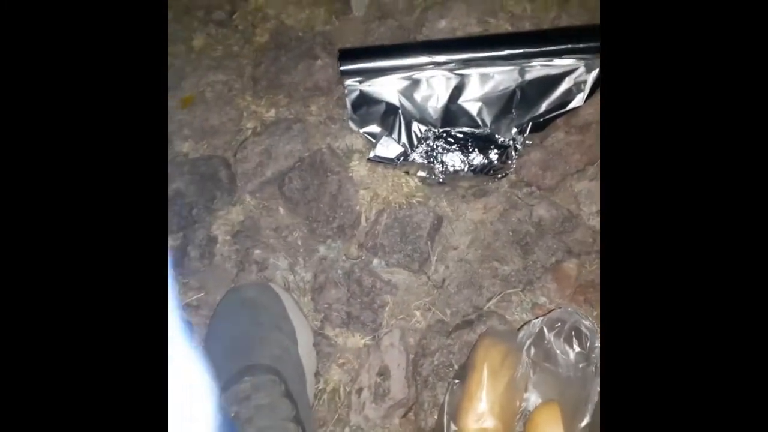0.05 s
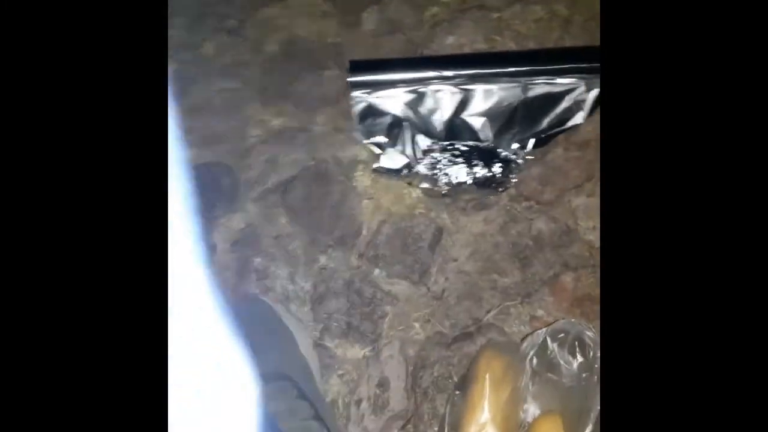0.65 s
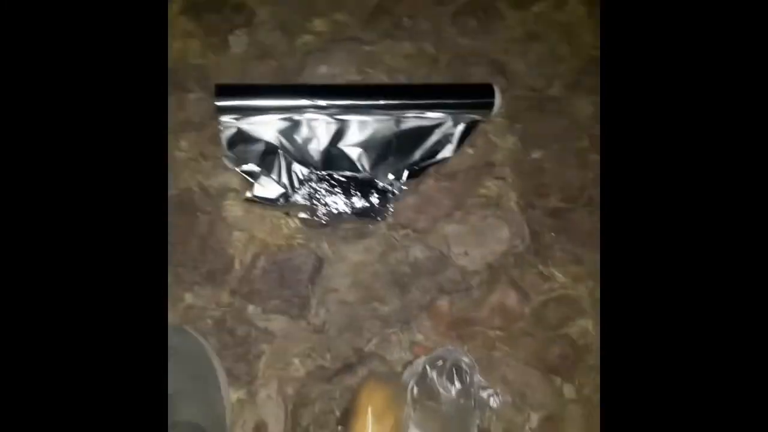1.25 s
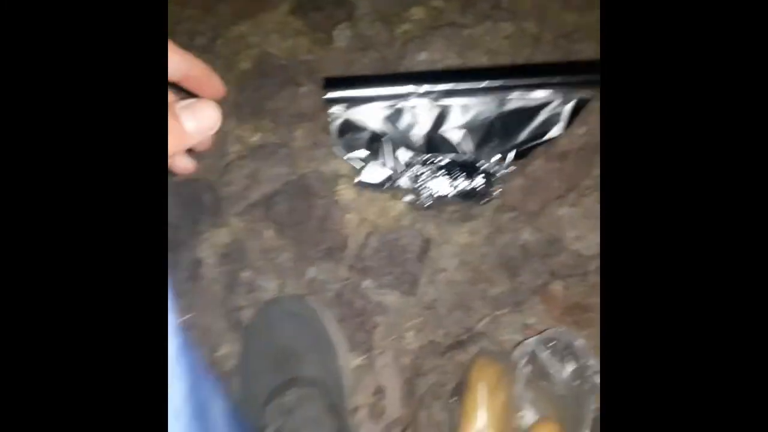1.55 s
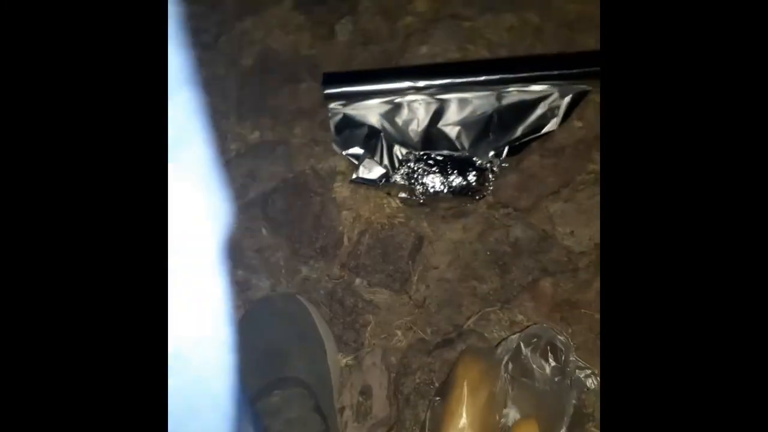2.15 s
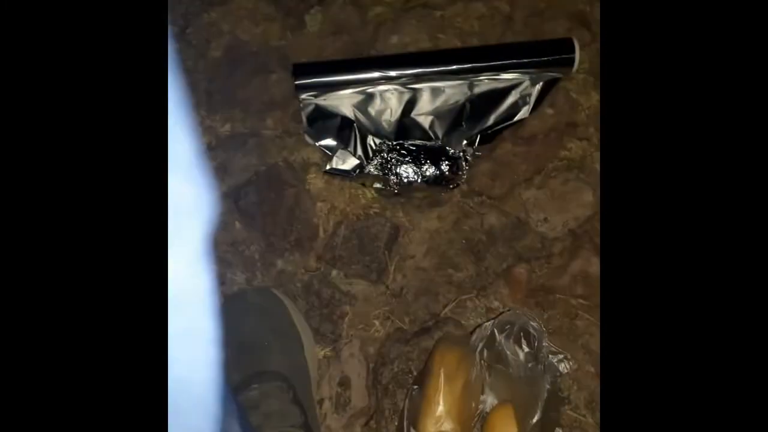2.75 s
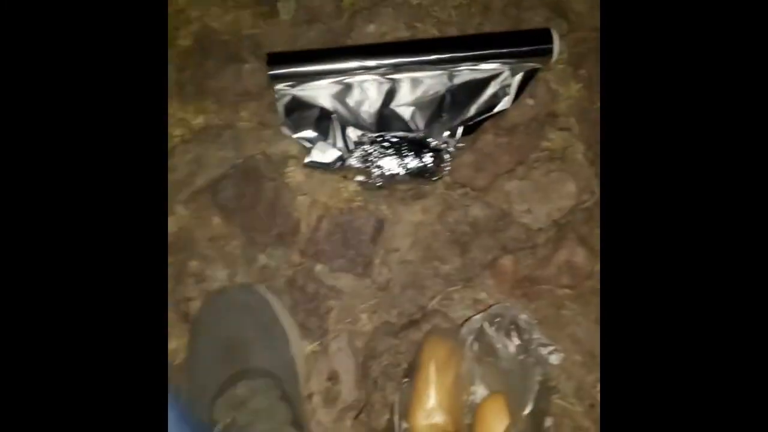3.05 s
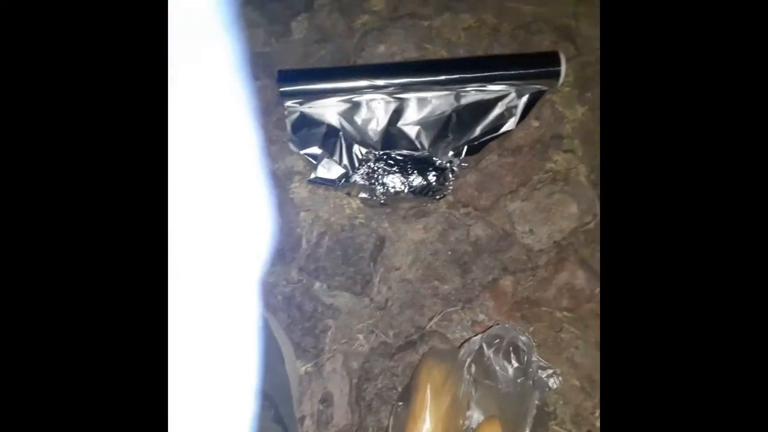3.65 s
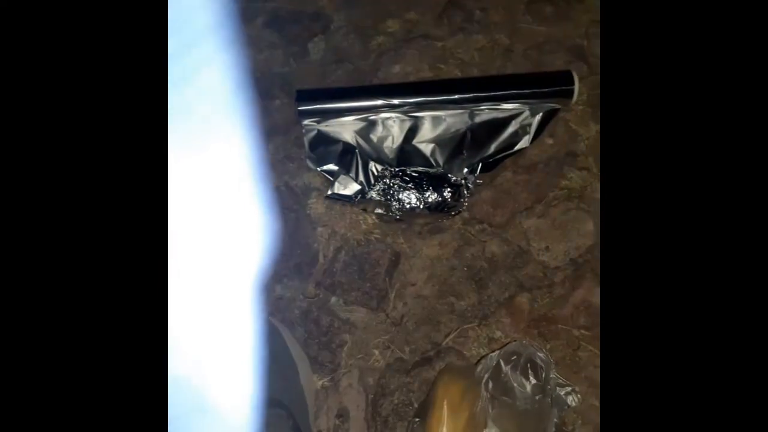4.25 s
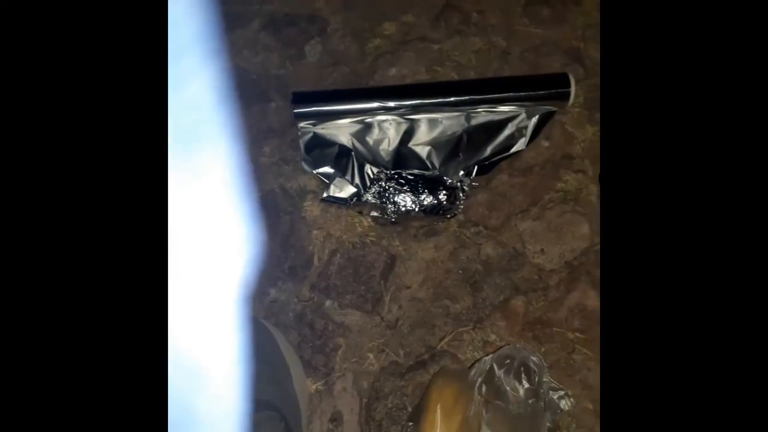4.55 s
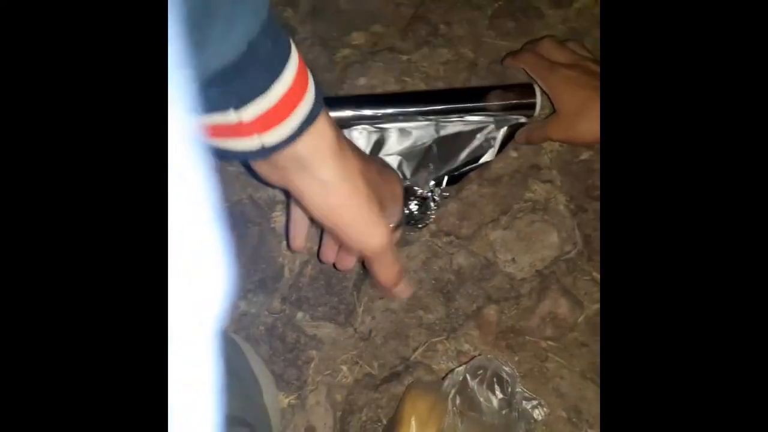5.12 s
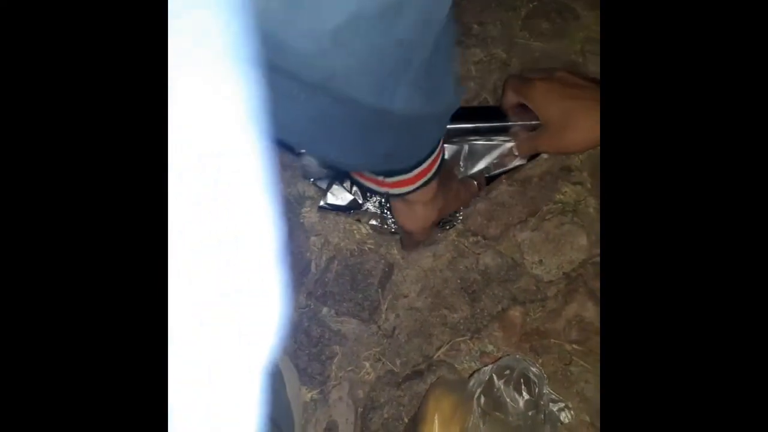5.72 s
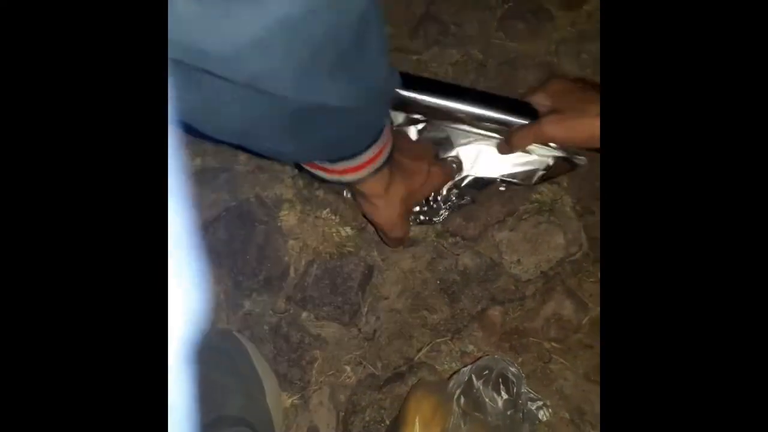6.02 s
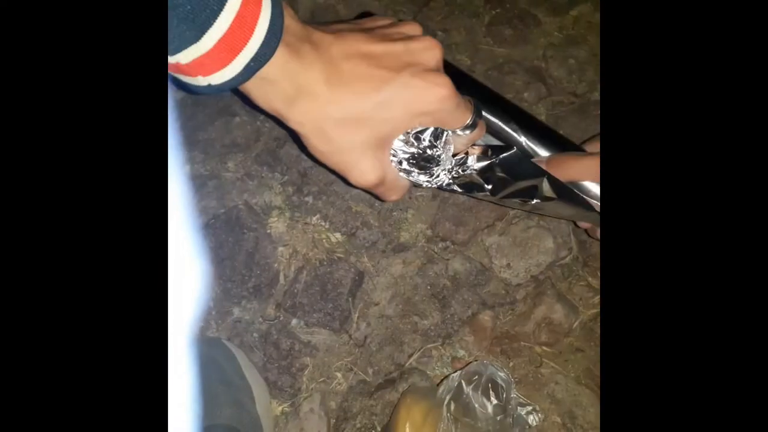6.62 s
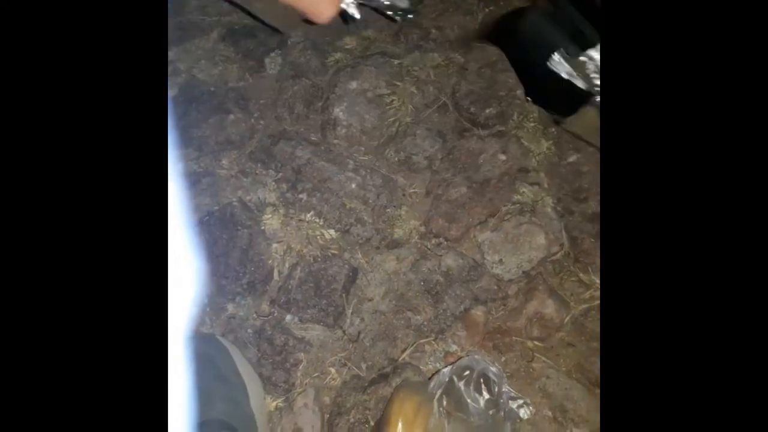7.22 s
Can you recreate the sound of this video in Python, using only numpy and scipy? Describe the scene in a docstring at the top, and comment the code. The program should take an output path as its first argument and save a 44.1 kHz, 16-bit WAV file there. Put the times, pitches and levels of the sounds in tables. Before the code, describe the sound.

For the first four seconds, a hand and clothing rub directly on a hand-held microphone, giving uneven rasps and low scraping that shift between left and right. The case creaks and clicks in clusters, thickest around 1 second, with dull finger bumps and a couple of strong knocks near 2.9 seconds. Behind this is still outdoor night air, with a distant insect trilling briefly and very faintly. From about 4 seconds a sleeve slides with a soft hiss. At about 4.5 seconds aluminium foil begins to crinkle close by, then is pressed and crumpled in repeated squeezes, with bright metallic crackles and small sharp snaps. More loud creaks and bumps from the grip come between 4.7 and 6 seconds, over a low handling rumble. At about 7 seconds the foil is torn off the roll with one quick rip, and the crinkling dies down by 7.5 seconds.

```python
"""Stony ground outdoors at night: someone wraps food in aluminium foil by a hand-held microphone pair.
Far off in the still air an insect trills faintly. At first a hand and clothing rub right over the two
microphone ports, and the case creaks and bumps in the grip. Then a sleeve slides and the foil is pressed
and crumpled: thousands of tiny creases buckle and set the sheet ringing. Near the end it is torn off
the roll with one quick rip."""
import sys
import numpy as np
from scipy import signal
from scipy.io import wavfile

SR = 44100
rng = np.random.default_rng(int(sys.argv[2]) if len(sys.argv) > 2 else 0)


def waveform_to_disk(signal):
    """Save audio, clipped to [-1, 1], as 16-bit WAV at the path in sys.argv[1]."""
    frames = np.transpose(np.atleast_2d(signal))
    scaled = np.clip(frames, -1, 1) * 32767
    samples = np.round(scaled).astype(np.int16)
    wavfile.write(sys.argv[1], SR, samples)


N = 329868
TIME = np.arange(N) / SR
SHORT_TIME = np.arange(SR // 12) / SR   # time axis of one short sound


def from_db(db):
    """Decibels to gain."""
    return np.exp(np.asarray(db) * (np.log(10) / 20))


def unit_power(x):
    """Scale to a mean square of 1."""
    return x / np.sqrt(np.mean(x ** 2) + 1e-20)


def unit_peak(x):
    """Scale to a peak of 1."""
    return x / np.abs(x).max()


def curves(rows):
    """One curve over time for each column after the first, which holds the seconds."""
    times, *columns = np.transpose(rows)
    return [np.interp(TIME, times, column) for column in columns]


def drift(per_s):
    """A random wander of unit power that turns per_s times a second."""
    points = rng.standard_normal(4096)
    return unit_power(np.interp(TIME * per_s, np.arange(len(points)), points))


def stroke(at_s, swell_s, hold_s, fade_s):
    """Gain of one movement: it swells to 1 at at_s, holds and fades; each slope spans 26.5 dB."""
    away = np.maximum((at_s - TIME) / swell_s, (TIME - at_s - hold_s) / fade_s)
    return from_db(-26.5 * np.clip(away, 0, 10))


def add(track, start_s, sound):
    """Mix a short sound into a track."""
    i = round(start_s * SR)
    track[..., i:i + sound.shape[-1]] += sound[..., :N - i]


def panned(pan_db):
    """Gains of the two microphone ports, the left louder by pan_db."""
    return from_db([[pan_db / 2], [-pan_db / 2]])


def spread(middle, side, side_db, pan_db):
    """A sound in front of both ports, with a part that differs between them."""
    side_gain = from_db(side_db)
    return (middle + side_gain * side * [[1], [-1]]) / np.hypot(1, side_gain) * panned(pan_db)


def band(x, low_hz, high_hz, order=2):
    """Causal band-pass."""
    sos = signal.butter(order, [low_hz, min(high_hz, .45 * SR)], "band", fs=SR, output="sos")
    return signal.sosfilt(sos, x + 1e-18)


def resonance(x, hz, width_hz):
    """One resonance of gain 1 at its centre."""
    return signal.lfilter(*signal.iirpeak(hz, hz / width_hz, fs=SR), x + 1e-18)


def gliding_resonance(x, hz, width_hz):
    """A resonance whose centre follows a curve, stepped in short blocks."""
    out, state, block = np.zeros_like(x), np.zeros((len(x), 2)), 256
    radius = np.exp(-np.pi * width_hz / SR)
    for i in range(0, N, block):
        poles = [1, -2 * radius * np.cos(2 * np.pi * hz[i] / SR), radius ** 2]
        out[:, i:i + block], state = signal.lfilter([1, 0, -1], poles, x[:, i:i + block], zi=state)
    return out * (1 - radius ** 2) / 2


def tick(low_hz, high_hz):
    """A single sharp pulse; peak 1."""
    return unit_peak(band(signal.unit_impulse(len(SHORT_TIME)), low_hz, high_hz))


def burst(low_hz, high_hz, t60):
    """A puff of noise that dies at once; peak 1."""
    puff = rng.standard_normal(len(SHORT_TIME)) * from_db(-60 * SHORT_TIME / t60)
    return unit_peak(band(puff, low_hz, high_hz))


def grains(per_s, spread_db):
    """Tiny slips at random moments: many small, few large; the power stays even as the rate changes."""
    sizes = from_db(spread_db * np.minimum(rng.exponential(1, N), 4)) * rng.choice([-1, 1], N)
    slipping = rng.random(N) < per_s / SR
    return slipping * sizes / np.sqrt(np.mean(sizes ** 2) * per_s / SR)


def friction(per_s, spread_db, smooth_db):
    """Two excitations that share the same slips, over a smooth sliding hiss."""
    return (grains(per_s, spread_db) + from_db(smooth_db)) * rng.standard_normal((2, N))


def coloured(excitations, spectrum, tilt_db=0, patchy_db=0):
    """Two excitations dealt in turn to third-octave bands, tilted per octave; each band flickers."""
    hz, level_db = np.transpose(spectrum)
    edges = np.geomspace(hz[0], hz[-1], round(3 * np.log2(hz[-1] / hz[0])) + 1)
    centres = np.sqrt(edges[1:] * edges[:-1])
    power = from_db(np.interp(np.log(centres), np.log(hz), level_db)) ** 2 * np.diff(edges)
    out = 0
    for k, share in enumerate(power / power.sum()):
        gain = from_db(tilt_db * np.log2(centres[k] / 3400) + patchy_db * drift(40))
        out += np.sqrt(share) * gain * unit_power(band(excitations[k % 2], edges[k], edges[k + 1]))
    return out


# The night air all round the microphones. Each row: frequency in Hz, relative density in dB.
AIR_SPECTRUM = [(30, -10.5), (110, -24), (350, -5), (800, -11), (4500, -6), (9500, -20.5), (16000, -16.5)]


def night_air():
    """Still air: a faint hush, its own at each port."""
    hush = [coloured(rng.standard_normal((2, N)), AIR_SPECTRUM) for _ in range(2)]
    return from_db(-67) * np.array(hush)


# One insect, far off in the dark. Each row: start in seconds, length in seconds, level in dB.
TRILLS = [(1.42, 0.081, -60), (2.775, 0.35, -66), (3.958, .1, -70)]


def insect():
    """A thin, wavering tone, pulsed by about 60 wing strokes a second."""
    phrases = sum(from_db(db) * stroke(start_s, .02, length_s, .02) for start_s, length_s, db in TRILLS)
    tone = unit_power(np.array([np.sin(2 * np.pi * 2980 * TIME + 2 * drift(170)) for _ in range(2)]))
    wing_strokes = 1 + .8 * np.sin(2 * np.pi * 60 * TIME + drift(8))
    return phrases * tone * wing_strokes


# An arm reaches for the foil, in front of the microphones. Each row: time in seconds, level in dB.
SLEEVE_LEVELS = [(4.03, -72), (4.08, -55.5), (4.45, -47.5), (4.68, -53.5), (4.9, -90)]
# The colour of its sleeve. Each row: frequency in Hz, relative density in dB.
SLEEVE_SPECTRUM = [(410, -41), (700, -8), (1170, -9.5), (1260, -8), (2020, -12.5), (2590, -8),
                   (4800, -10.5), (16000, -50)]


def sleeve():
    """Smooth hiss of cloth sliding on cloth."""
    level_db, = curves(SLEEVE_LEVELS)
    hiss = [coloured(rng.standard_normal((2, N)), SLEEVE_SPECTRUM, patchy_db=3) for _ in range(2)]
    return spread(*hiss, side_db=1, pan_db=1) * from_db(level_db)


# The hand shifts on the microphone case while the foil is worked. Each row: time in seconds, level in dB.
GRIP_LEVELS = [(4.2, -62.5), (5.0, -44), (5.28, -62), (5.52, -34), (5.66, -44), (6.15, -52), (6.64, -50),
               (6.71, -36.5), (6.81, -36), (6.88, -52), (7.1, -37.5), (7.45, -55)]


def grip_rumble():
    """The shifting grip sends a dull rumble through the case, its own at each port."""
    level_db, = curves(GRIP_LEVELS)
    rumble = unit_power(band(rng.standard_normal((2, N)), 61, 143))
    return rumble * from_db(level_db) * panned(1.8) * (TIME > GRIP_LEVELS[0][0])


def fingertip_groan():
    """A fingertip drags over the case by the right port with a low, rough note that rises."""
    start_s, hold_s, rise_hz_per_s = .19, .085, 1600
    hz = 198 + rise_hz_per_s * np.clip(TIME - start_s, 0, hold_s)
    note = unit_power(gliding_resonance(rng.standard_normal((1, N)), hz, width_hz=91))
    return note * from_db(-43) * stroke(start_s, .035, hold_s, 2 * hold_s) * panned(-20.5)


# The case creaks with a brief, squeaky ring, close to one port. Each row: loudest moment in seconds,
# half length in seconds, pitch in Hz, level in dB, left over right in dB.
CREAK_RINGS = [(0.899, 0.0036, 1230, -28, -16), (0.928, 0.012, 1290, -42, -18),
               (2.9245, 0.0025, 1095, -28.5, 25)]


def creak_rings():
    """Quick sticking and slipping keeps one mode of the case ringing, unsteadily."""
    out = 0
    for at_s, half_s, hz, level_db, pan_db in CREAK_RINGS:
        tone = unit_power(np.sin(2 * np.pi * hz * TIME + drift(500)))
        envelope = np.exp(-((TIME - at_s) / half_s) ** 2)
        out += tone * envelope * from_db(level_db) * panned(pan_db)
    return out


# Cloth catches right at the microphones. Each row: start in seconds, level in dB, left over right in dB.
SNAGS = [(0.7132, -33, -3), (0.983, -34.5, -2), (1.911, -23, 20), (2.4432, -18.5, 19.5),
         (2.6755, -16.5, 13), (2.8727, -23, 26)]


def fibre_snags():
    """A fibre snags on the rim of a port with a bright, dry tick."""
    out = np.zeros((2, N))
    click = tick(4300, 6900) + tick(11000, 24000) / 2
    for start_s, level_db, pan_db in SNAGS:
        add(out, start_s, from_db(level_db) * click * panned(pan_db))
    return out


# The modes of the case: the stiff ones as each microphone hears them, and the low ones at both.
# Each row: frequency in Hz, relative level in dB, swell in seconds.
LEFT_MODES = [(760, -15, 0.00063), (1663, 7, 0.00032), (4050, 14.5, 0.00012), (6400, -2.5, 0.00023)]
RIGHT_MODES = [(900, -7.5, 0.0004), (1457, 15.5, 0.00034), (4600, -13, 0.00085), (6350, -18.5, 0.00044)]
LOW_MODES = [(122.7, -19.5, 0.0088), (353, 2.5, 0.0022), (840, 7.5, 0.00032)]


def case_ring(modes, tuning=1):
    """One blow on the case: each mode swells and dies, with a strength and pitch of its own; peak 1."""
    hz, level_db, swell_s = np.transpose(modes)[:, :, None]
    strength, detune = rng.standard_normal((2, len(modes), 1))
    envelopes = SHORT_TIME / swell_s * np.exp(-SHORT_TIME / swell_s)
    tones = np.sin(2 * np.pi * hz * tuning * np.exp(.04 * detune) * SHORT_TIME)
    return unit_peak((from_db(level_db + 1.5 * strength) * envelopes * tones).sum(0))


# A finger lands right on the left microphone port. Each row: start in seconds, level in dB.
KNOCKS = [(2.869, -7), (2.936, -3), (3.1658, -14)]


def port_knocks():
    """A sudden push of air into the left port, which leaks away while the case rings low."""
    out = np.zeros((2, N))
    push = band(tick(30, 5000), 130, 800, order=1)
    for start_s, level_db in KNOCKS:
        knock = push / push.max() + from_db(-11.5) * case_ring(LOW_MODES)
        add(out[0], start_s, from_db(level_db) * knock)
    return out


# Fingers on the case, around the microphones. Each row: start in seconds, relative level in dB at the
# nearer port, place (1 at the left port, -1 at the right).
BUMPS = [(1.022, -6, -1.1), (1.223, -5, -1.3), (1.583, -9, 0.68), (1.647, -6, 0.83), (1.723, -13, 0.74),
         (1.801, -11, 1), (2.441, -14, -0.59), (2.661, -9, -0.59), (2.869, -0.5, 0.77), (2.892, 0, 0.63),
         (3.12, -14.5, 0.78), (3.248, -9, 0.86), (3.332, -20.5, 1), (3.37, -20.5, -0.77),
         (3.65, -9.5, -1.3), (3.829, -19.5, -1.3), (4.596, -14.5, -0.9), (4.721, -6.5, -1),
         (4.807, -8, -0.47), (5.795, -8.5, -1.5), (6.143, -9.5, 0.3)]


def finger_bumps():
    """Soft bumps reach only the low modes of the case, at each port in its own way."""
    shadow_db = 34.5   # a bump on one port is this much weaker at the other
    out = np.zeros((2, N))
    for start_s, near_db, place in BUMPS:
        for port, distance in zip(out, (-place, place)):
            level_db = near_db - shadow_db * max(distance, 0)
            thump = unit_peak(band(case_ring(LOW_MODES), 40, 163))
            add(port, start_s, from_db(level_db - 10) * thump)
    return out


# The microphone case slips in the hand. Each row: start in seconds, left level in dB, right level in dB,
# thud in dB relative to the ring at the right port.
CREAKS = [(0.8004, -17.5, -32, -21), (0.8156, -10, -13.5, -13), (0.8409, -12, -13, -10),
          (0.8994, -20, -26.5, 4.5), (0.9115, -35, -14, -29), (0.926, -21, -20, -15), (1.035, -11, -15, -2),
          (1.0504, -31, -18.5, -2), (1.065, -23.0, -20, 1), (1.0949, -13.5, -9.5, -7),
          (1.1204, -5.0, -9.5, -6), (1.132, -16, -16.5, 6.5), (1.1739, -2.5, -6, -4),
          (1.1837, -8.5, -12, -2.5), (1.194, -4, -12, 4.5), (1.2095, -10, -14, -7), (1.222, -2, -23, -13),
          (1.2534, -16, -1, -31), (1.4756, -44, -18, -14), (2.0484, -13.5, -12.5, -1),
          (2.0856, -6.5, -10, -6.5), (2.106, -10, -11.5, -10), (2.1327, -4, -13.5, -2),
          (2.6754, -8.5, -12.5, -4.5), (2.862, -6, -30, -19), (2.8941, -5.5, -35, 9),
          (3.4423, -37, -35, 11.5), (3.4641, -28, -26, 8), (3.5066, -21.5, -21, 2),
          (3.5242, -23, -19.5, -3), (3.5603, -25, -25, 4.5), (3.6285, -10, -16.5, -3),
          (3.637, -19, -22, -2), (3.6495, -8.5, -14, -20), (4.444, -44, -55, 29), (4.7725, -1, -10, -12),
          (4.8311, -6, -11, -17), (4.8705, -6.5, -11.5, -11), (4.9099, -7, -14, -9), (4.9351, 1, -11, -4),
          (5.394, -41, -56, 30), (5.5855, -2.5, -9.5, -16), (5.6908, -6, -10, -8), (5.7596, -4.0, -10, -11),
          (5.794, -2.5, -24, -6), (5.9054, -1.5, -8, -10), (7.4632, -26, -30.5, -4)]
# A tighter grip raises the stiff modes. Each row: time in seconds, pitch ratio.
GRIP_TUNING = [(1.22, 1.04), (1.25, 0.95), (2.1, .88), (3.6, 1.004), (4.7, 1.07)]


def case_creaks():
    """Each slip rings the stiff modes of the case over a low thud, which is weaker on the left."""
    right_lag_s = .00036
    left, right = out = np.zeros((2, N))
    for start_s, left_db, right_db, thud_db in CREAKS:
        tuning = np.interp(start_s, *np.transpose(GRIP_TUNING))
        thud = from_db(thud_db) * case_ring(LOW_MODES)
        # the more one-sided the slip, the more treble at the left port
        crack_db = -14.5 + min(.53 * abs(left_db - right_db), 20)
        crack = from_db(crack_db) * tick(2600, 16000)
        at_left = case_ring(LEFT_MODES, tuning) + from_db(-19) * thud + crack
        at_right = case_ring(RIGHT_MODES, tuning) + thud
        add(left, start_s, from_db(left_db) * at_left)
        add(right, start_s + right_lag_s, from_db(right_db) * at_right)
    return out


# Cloth and skin pass directly over each microphone port. Each row: moment of full pressure, swell, hold
# and fade in seconds, relative drag and rasp levels in dB, brightness in dB per octave.
LEFT_STROKES = [(0.28, 0.2, 0.014, 0.27, -42, -39, -2), (0.56, 0.059, 0.0091, 0.045, -61.5, -51, 4),
                (0.82, 0.1, 0.087, 0.089, -43, -47, -4), (1.17, 0.15, 0.069, 0.2, -37, -30.5, 0),
                (1.576, 0.069, 0.0069, 0.17, -23.5, -28, -0.5), (1.86, 0.1, 0.042, 0.14, -41, -38, 2.5),
                (2.142, 0.032, 0.023, 0.024, -27, -13, 2), (2.45, 0.16, 0.03, 0.075, -55, -39.5, 4),
                (2.67, 0.085, 0.09, 0.015, -51.5, -46, 3), (2.872, 0.018, 0.028, 0.02, -26, -18.5, 0.4),
                (2.921, 0.03, 0.0061, 0.015, -27, -24, -1.5),
                (3.128, 0.012, 0.012, 0.063, -37.5, -45.5, -1.5),
                (3.25, 0.027, 0.031, 0.041, -31.5, -33, -1.2), (3.33, 0.015, 0.01, 0.084, -44, -42, 0.5),
                (3.447, 0.01, 0.13, 0.022, -46, -52, 0), (3.63, 0.051, .015, 0.46, -55, -45, 0),
                (3.88, 0.11, 0.053, 0.088, -64, -55, 3.5)]
RIGHT_STROKES = [(0.06, 0.096, 0.14, 0.065, -47, -50.5, 1), (0.235, 0.11, 0.034, 0.34, -33, -33, 0.5),
                 (0.555, 0.014, 0.016, 0.015, -40.5, -33.5, -1), (0.8, 0.25, 0.081, 0.12, -42.5, -41, -1),
                 (1.03, 0.13, 0.19, .08, -36.5, -45, -2.5), (1.18, 0.062, 0.059, 0.15, -28.5, -27, 0.5),
                 (1.36, 0.1, 0.016, 0.15, -37.5, -37, 1.5), (1.54, 0.033, 0.013, 0.077, -22.5, -23.5, 3),
                 (1.65, 0.067, 0.032, 0.04, -31, -39, 3.5), (1.85, 0.055, 0.099, 0.3, -29, -35.5, 0),
                 (2.06, 0.057, 0.12, 0.035, -36.5, -42, 2.5), (2.44, 0.063, 0.041, 0.1, -37, -38.5, 1.5),
                 (2.67, 0.096, 0.019, 0.1, -35.5, -39, 3), (2.875, 0.036, 0.1, 0.12, -46, -47, 3),
                 (3.255, 0.021, 0.022, 0.048, -44, -53, -3), (3.34, .05, 0.045, 0.1, -51, -53.5, 4),
                 (3.51, 0.057, 0.032, 0.11, -35.5, -44.5, 1), (3.635, 0.024, 0.023, 0.017, -27.5, -36.5, 2),
                 (3.712, 0.15, 0.037, 0.073, -32.5, -35, 0), (3.87, 0.14, 0.039, 0.089, -48, -37.5, 4)]
# The rasp at each port and the drag through the case. Each row: frequency in Hz, relative density in dB.
LEFT_RASP_SPECTRUM = [(800, 6), (1600, 2.5), (2600, -2), (4500, -4.5), (7500, -10.5), (10000, -20),
                      (13500, -9), (16000, -22)]
RIGHT_RASP_SPECTRUM = [(800, 0), (1600, -0.5), (2600, -3), (4500, -7), (7500, -12.5), (10000, -30),
                       (13500, -19.5), (16000, -24)]
DRAG_SPECTRUM = [(40, -16), (65, -5.5), (110, 0.5), (190, -6.5), (330, -1), (480, -5.5), (700, -7.5)]


def port_rubbing(strokes, rasp_spectrum, drag_trim_db, rasp_trim_db):
    """Fibres catch on one port: each stroke gives a low drag and a rasp of its own brightness."""
    drag_power = rasp_power = weighted_tilt = 0
    for *timing, drag_db, rasp_db, tilt_db in strokes:
        contact = stroke(*timing) ** 2
        drag_power += contact * from_db(drag_db) ** 2
        rasp_power += contact * from_db(rasp_db) ** 2
        weighted_tilt += contact * from_db(rasp_db) ** 2 * tilt_db
    catching = drift(110)
    coarse_slips = friction(per_s=1100, spread_db=2.7, smooth_db=-5.5)
    drag = coloured(coarse_slips, DRAG_SPECTRUM, patchy_db=4.5)
    drag *= from_db(drag_trim_db + .69 * catching)
    fine_slips = friction(per_s=5000, spread_db=3.35, smooth_db=-1.3)
    rasp = coloured(fine_slips, rasp_spectrum, weighted_tilt / rasp_power, patchy_db=2.5)
    rasp *= from_db(rasp_trim_db + 2.06 * catching)
    return drag * np.sqrt(drag_power) + rasp * np.sqrt(rasp_power)


# Hands press steadily on the foil, in front of the microphones.
# Each row: time in seconds, relative flexing level in dB, relative crinkle level in dB.
PRESSURE = [(4.05, -65.5, -69), (4.46, -40.5, -62), (4.68, -50.5, -54), (4.74, -35, -36),
            (5.0, -43.5, -42.5), (5.21, -64, -57), (5.36, -42, -41.5), (5.74, -40, -37), (5.88, -35.5, -35),
            (6.6, -40, -39.5), (6.91, -49, -44.5), (7.03, -40.5, -31.5), (7.22, -45, -43),
            (7.478, -54.5, -55)]
# A squeeze crushes a clump of creases.
# Each row: moment of full pressure in seconds, hold in seconds, relative crinkle level in dB.
SQUEEZES = [(4.931, 0.0031, -26.5), (5.053, 0.029, -34), (5.129, 0.033, -35), (5.243, 0.033, -41.5),
            (5.439, 0.014, -38), (5.563, 0.06, -31.5), (5.816, 0.0066, -28), (5.878, 0.085, -32.5),
            (5.962, 0.018, -34), (6.052, 0.082, -33.5), (6.177, 0.06, -27.5), (6.297, 0.022, -34),
            (6.345, 0.07, -32.5), (6.487, 0.0053, -33), (6.631, 0.0088, -35.5), (6.794, 0.014, -34.5),
            (6.833, 0.017, -38.5), (7.278, 0.094, -40.5)]


def foil_effort():
    """Pressure, squeezes and the rip add up to flexing gain, crinkle gain and tilt in dB per octave."""
    steady_flex, steady_crinkle = from_db(curves(PRESSURE))
    squeezes = sum(from_db(db) * stroke(at_s, .023, hold_s, .044) for at_s, hold_s, db in SQUEEZES)
    crushing = np.hypot(steady_crinkle, squeezes)
    flexing = np.hypot(steady_flex, from_db(-10.5) * squeezes)
    # the sheet is torn off the roll, and the tear gathers speed
    rip_s, rip_hold_s, rip_growth_db = 6.941, .05, 1.5
    rip = stroke(rip_s, .019, rip_hold_s, .045)
    torn = np.clip((TIME - rip_s) / rip_hold_s, 0, 1)
    tearing = from_db(-19 + rip_growth_db * torn) * rip
    squeeze_boost_db = 20 * np.log10(crushing / steady_crinkle)
    tilt_db = -.13 + .06 * squeeze_boost_db + .1 * rip
    return np.hypot(flexing, tearing), np.hypot(crushing, tearing), tilt_db


# The low rustle of the foil, a little to the right. Each row: frequency in Hz, relative density in dB.
FLEX_SPECTRUM = [(60, -12), (120, -8), (230, -8.5), (345, 4), (480, -5.5), (700, -9.5)]


def foil_flex():
    """The whole sheet flexes with a low rustle."""
    rustle = [coloured(friction(per_s=900, spread_db=2.4, smooth_db=-8.5), FLEX_SPECTRUM, patchy_db=1.5)
              for _ in range(2)]
    return spread(*rustle, side_db=-11, pan_db=-4) * from_db(-2.5)


# The crinkle, wide across both microphones. Each row: frequency in Hz, relative density in dB.
CRINKLE_SPECTRUM = [(700, -3), (1150, -0.5), (1600, -2), (2200, -6.5), (3000, -3), (4200, -6), (5400, -8),
                    (6500, -8.5), (8000, -8), (9300, -27), (13000, -12.5), (16000, -26)]


def foil_crinkle(crinkle_gain, tilt_db):
    """Thousands of tiny creases buckle; harder crumpling folds more of them."""
    creases_per_s = 3500 * (crinkle_gain / from_db(-31)) ** .46
    creases = [friction(creases_per_s, spread_db=3.3, smooth_db=-6.5) for _ in range(2)]
    crinkle = [coloured(slips, CRINKLE_SPECTRUM, tilt_db, patchy_db=2.5) for slips in creases]
    return spread(*crinkle, side_db=-1.5, pan_db=1.5) * from_db(-1.22)


# Lone sharp creases, at both microphones. Each row: time in seconds, level in dB re the crinkle gain.
PING_LEVELS = [(5.1, -36), (5.9, -16), (6.2, -16.5), (6.85, -11.5), (7.08, -8), (7.4, -11)]


def crease_pings():
    """The sharpest creases stand out as pings a millisecond long, each in one of four treble bands."""
    level_db, = curves(PING_LEVELS)
    decay_s = .0006
    out = 0
    for low_hz, high_hz in [(3000, 5500), (4500, 8000), (6000, 14000), (11000, 15500)]:
        creases = np.abs(grains(per_s=50, spread_db=5)) + 1e-18
        envelope = signal.lfilter([1], [1, -np.exp(-1 / (decay_s * SR))], creases)
        out += unit_power(band(envelope * rng.standard_normal((2, N)), low_hz, high_hz))
    return unit_power(out) * from_db(level_db)


# Single folds of foil, the first ones well to the left.
# Each row: start in seconds, relative level in dB, left over right in dB.
FOLD_SNAPS = [(4.502, -31.5, 23), (4.595, -34, 29), (4.71, -26.5, 20), (4.731, -26, 16), (4.955, -27, 5),
              (5.5, -26, -3), (6.198, -21, -3), (6.228, -23.5, 6), (6.492, -18.5, -3), (6.684, -22.5, 4),
              (6.79, -22, 4), (6.998, -10.5, 10)]


def fold_snaps():
    """A fold buckles with a short snap and a faint, longer fizz on top."""
    out = np.zeros((2, N))
    for start_s, level_db, pan_db in FOLD_SNAPS:
        snap = burst(730, 6460, t60=.013) + from_db(-19) * burst(8000, 12600, t60=.034)
        add(out, start_s, from_db(level_db + 2) * snap * panned(pan_db))
    return out


# The steady ringing zone of the held foil. Each row: centre in Hz, width in Hz, relative level in dB.
SHEET_ZONES = [(4770, 1200, 1)]
# Its main zone glides as it is bent. Each row: time in seconds, centre in Hz, relative level in dB.
SHEET_BEND = [(5.12, 2830, -4), (5.33, 3660, -7), (5.43, 3240, 2), (5.56, 4200, 4), (5.9, 4500, -14),
              (6.2, 5110, -13), (6.58, 5150, 10.5), (6.98, 5160, 3.5), (7.09, 3540, 3), (7.35, 3300, -2)]


def sheet_zones(creases):
    """The zones of the held sheet ring; cupped in the hand for a moment, the foil loses its middle."""
    held = np.interp(TIME, [4.9, 5.3], [.25, 1])
    bend_hz, bend_db = curves(SHEET_BEND)
    steady = sum(from_db(db) * resonance(creases, hz, width_hz) for hz, width_hz, db in SHEET_ZONES)
    wavering_hz = bend_hz * (1 + .04 * drift(22))
    gliding = from_db(bend_db) * gliding_resonance(creases, wavering_hz, width_hz=400)
    ringing = creases + held * (steady + gliding)
    cupped = stroke(6.185, swell_s=.045, hold_s=.053, fade_s=.045)
    return ringing - .77 * cupped * resonance(ringing, hz=2420, width_hz=2400)


def sheet_shimmer(creases, t60, wet_db):
    """Every crease leaves the countless modes of the sheet ringing; they keep changing as it crumples."""
    block = len(SHORT_TIME)
    ringing = np.zeros_like(creases)
    for i in range(0, N, block):
        tail = rng.standard_normal((2, block)) * from_db(-60 * SHORT_TIME / t60)
        tail /= np.linalg.norm(tail[0])
        add(ringing, i / SR, signal.fftconvolve(creases[:, i:i + block], tail, axes=1))
    return (creases + from_db(wet_db) * ringing) / np.hypot(1, from_db(wet_db))


def foil():
    """Creases buckle in clumps and ring through the sheet, while the whole of it flexes."""
    flex_gain, crinkle_gain, tilt_db = foil_effort()
    crinkle = foil_crinkle(crinkle_gain, tilt_db)
    flex = flex_gain * foil_flex()
    clumps = from_db(1.2 * drift(75))
    creases = crinkle_gain * (crinkle * clumps + crease_pings()) + fold_snaps()
    return sheet_shimmer(sheet_zones(creases), t60=.026, wet_db=-5) + flex


def scene():
    """Handling right on the microphones, sleeve and foil in front of them, the night beyond."""
    left = port_rubbing(LEFT_STROKES, LEFT_RASP_SPECTRUM, drag_trim_db=-.4, rasp_trim_db=0)
    right = port_rubbing(RIGHT_STROKES, RIGHT_RASP_SPECTRUM, drag_trim_db=-2.04, rasp_trim_db=1.36)
    handling = np.array([left, right]) + case_creaks() + finger_bumps() + port_knocks()
    handling += fingertip_groan() + creak_rings() + fibre_snags() + grip_rumble()
    reach_s = SLEEVE_LEVELS[0][0]
    wrapping = (foil() + sleeve()) * (TIME > reach_s)
    return handling + wrapping + night_air() + insect()


def record(dry):
    """The bass rolls off below 48 Hz, peaks stop at full scale, and the top is cut at 16 kHz."""
    low_cut = signal.butter(2, 48, "high", fs=SR, output="sos")
    high_cut = signal.ellip(10, .2, 80, 16000, fs=SR, output="sos")
    clipped = np.clip(signal.sosfilt(low_cut, dry), -1, 1)
    return signal.sosfilt(high_cut, clipped)


dry = scene()
out = record(dry)
waveform_to_disk(out)
```